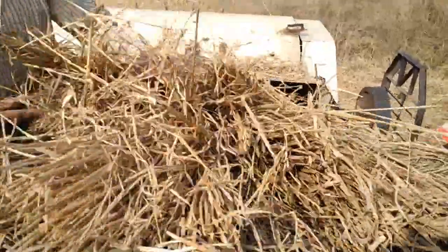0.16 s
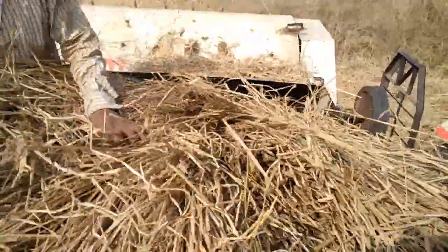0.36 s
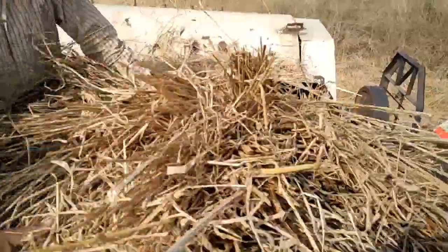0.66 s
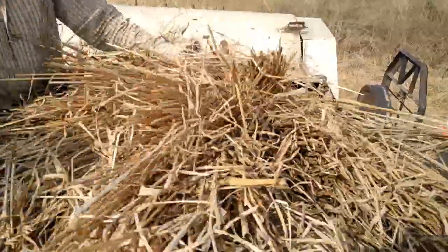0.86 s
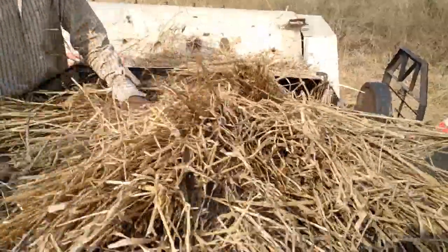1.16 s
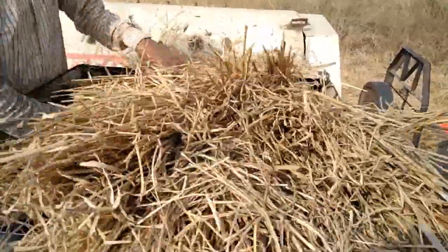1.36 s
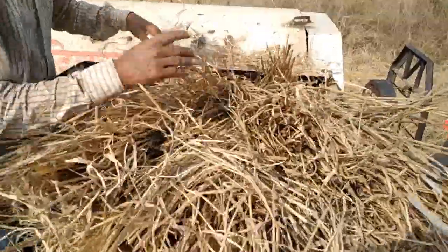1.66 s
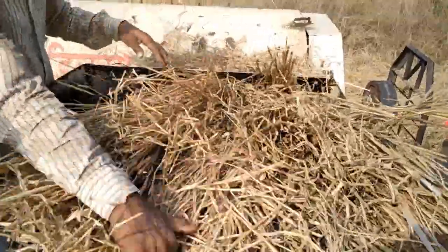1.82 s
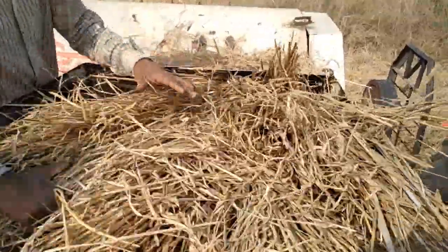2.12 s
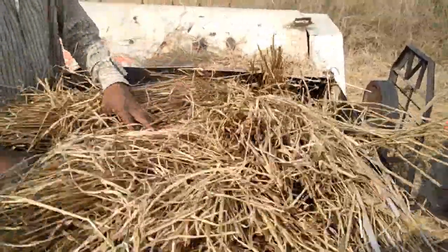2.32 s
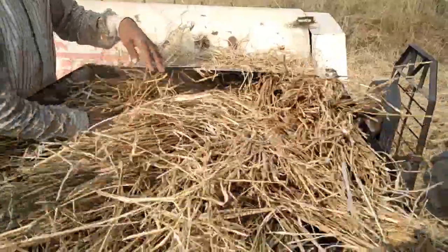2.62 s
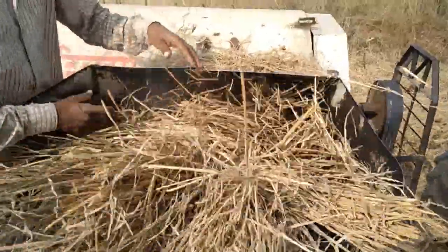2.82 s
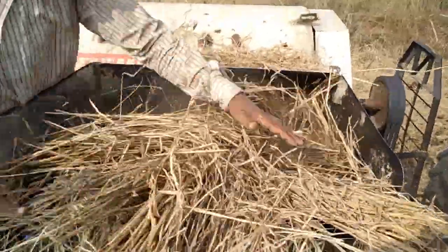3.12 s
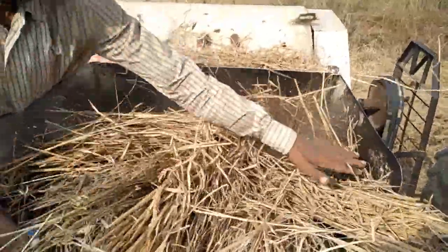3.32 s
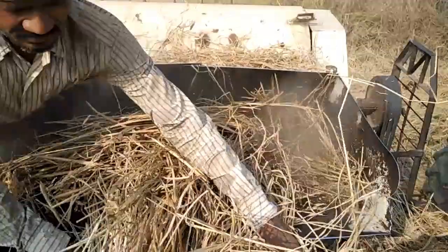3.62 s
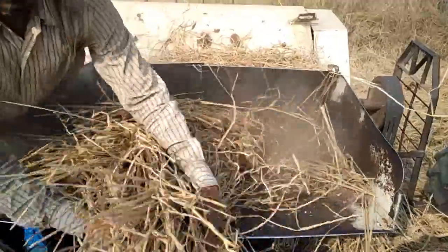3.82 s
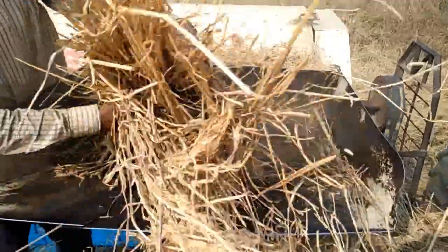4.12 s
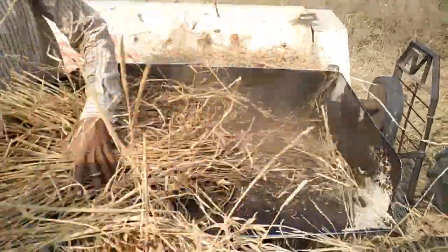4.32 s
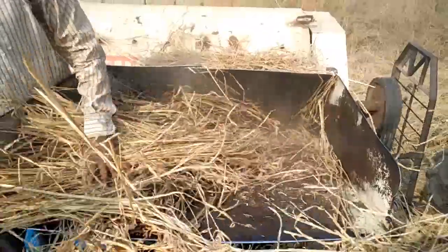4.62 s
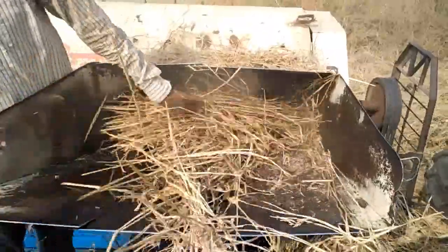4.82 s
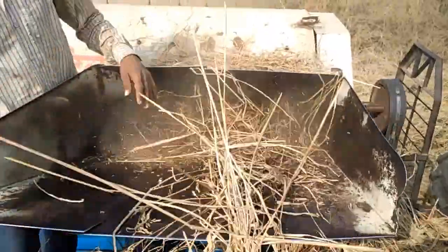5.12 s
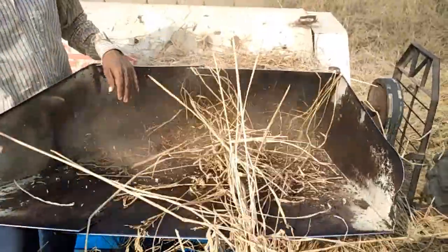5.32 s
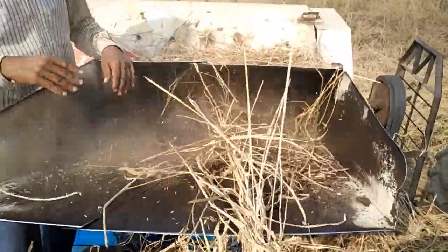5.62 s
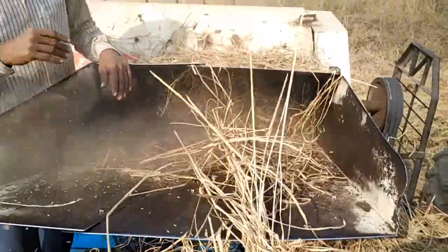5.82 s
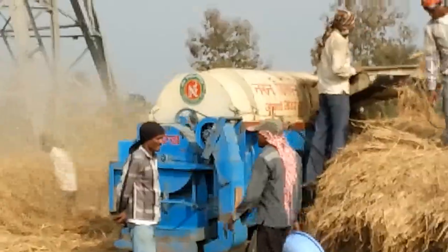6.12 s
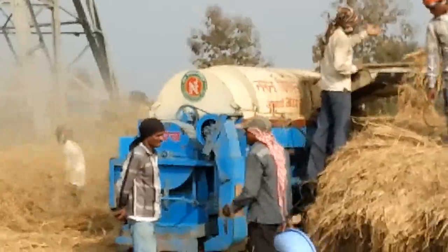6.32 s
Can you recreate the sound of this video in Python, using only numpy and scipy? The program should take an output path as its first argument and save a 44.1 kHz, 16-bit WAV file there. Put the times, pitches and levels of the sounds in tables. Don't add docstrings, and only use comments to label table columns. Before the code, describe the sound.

A threshing machine runs loaded as straw is pushed in by hand. It starts at full roar, with rapid uneven metal bangs, crackling straw and seed spraying on plates; the low roar thins slightly as the tray empties while the bright hiss holds up. Fan draught buffets a close stereo phone microphone outdoors. Everything stops abruptly just before six seconds, leaving silence.

```python
import sys
import numpy as np
from scipy import signal
from scipy.fft import rfft, irfft, next_fast_len
from scipy.io import wavfile
from scipy.ndimage import uniform_filter1d

SR = 44100
rng = np.random.default_rng(int(sys.argv[2]) if len(sys.argv) > 2 else 0)


def undo_db(level):
    steps = np.asarray(level, float) / 20
    return 10 ** steps


def generate_wav(signal):
    frames = np.transpose(np.atleast_2d(signal))
    scaled = np.clip(frames, -1, 1) * 32767
    pcm = np.round(scaled).astype(np.int16)
    wavfile.write(sys.argv[1], SR, pcm)


N = 284886

# time in seconds, roar level in dB.
DRUM_LOAD = [(0.0, -16), (0.16, -15.5), (0.67, -19.5), (0.8, -16.5), (1.08, -19), (1.15, -17.5),
             (1.33, -18.5), (1.49, -17.5), (1.69, -20), (2.92, -19), (2.97, -26), (3.36, -20.5),
             (4.25, -20), (4.94, -15.5), (5.02, -17.5), (5.89, -19)]
# frequency in Hz, density in dB per Hz.
THUD_SPECTRUM = [(15, -68), (25, -55.5), (118, -0.5), (193, 6.5), (277, 1.5), (343, -7.5), (551, -6.5),
                 (639, -7), (817, -1.5), (1030, -7), (1250, -29.5), (1620, -54), (2750, -120)]
# centre in Hz, share of the roar in dB, change as the tray empties in dB.
CASING_PARTS = [(200, -4.5, -7), (370, -7.5, -4), (540, -9.5, 0.5), (800, -8, -0.5)]
# centre in seconds, gain in
# dB, part of the casing in Hz, length in seconds.
WAD_HITS = [(0.02, 2, 800, 0.093), (0.19, 4.5, 427, 0.15), (0.736, 4, 370, 0.039), (0.806, 10, 480, 0.034),
            (0.917, 8, 580, 0.13), (1.155, 7, 258, 0.055), (1.298, 7, 540, 0.054), (1.443, 6.5, 610, 0.034),
            (1.55, 1.5, 370, 0.086), (1.64, 5.5, 520, 0.065), (1.727, 7, 370, 0.088), (1.84, 5, 200, 0.089),
            (2.212, 10, 520, 0.14), (2.413, 8, 370, 0.053), (2.414, 5, 800, 0.042), (2.573, 9, 566, 0.044),
            (2.634, 8.5, 200, 0.038), (2.755, -1.5, 540, 0.07), (2.84, 1, 200, 0.041),
            (3.232, 8, 540, 0.085), (3.358, 3, 800, 0.04), (3.58, 5.5, 395, 0.14), (3.867, 8.5, 370, 0.29),
            (4.02, 3, 370, 0.088), (4.28, 5, 745, 0.22), (4.435, 9, 288, 0.18), (4.675, 7, 800, 0.029),
            (4.837, 15, 484, 0.021), (4.958, 7, 800, 0.04), (5.568, 5.5, 200, 0.05), (0.02, 5, 380, 0.051),
            (0.6, -5, 350, 0.1), (0.64, 4, 850, 0.029), (0.69, 4.5, 540, 0.1), (1.363, 6, 190, 0.033),
            (2.07, 5, 540, 0.055), (2.858, 4, 540, 0.054), (3.1, 3, 540, 0.074), (3.203, -5, 200, 0.044),
            (3.381, 6.5, 240, 0.06), (3.7, 2, 320, 0.042), (3.735, 2, 850, .05), (3.94, -6, 558, 0.048),
            (4.165, 6.5, 370, .04), (4.23, 3, 556, 0.021), (4.643, 4.5, 200, 0.055), (4.716, 7, 300, 0.044),
            (5.609, -1.5, 340, 0.059), (5.8, 5.5, 646, 0.057), (5.873, 5.5, 200, 0.046)]
# frequency in Hz, width in Hz, level in dB.
PANEL_MODES = [(138, 34, -24.5), (159, 21, -6.5), (191, 31, -2), (199, 52, -2), (258.6, 39, -2),
               (340, 19, -3.5), (366, 13, -5), (443, 91, -19), (520, 19, -13.5), (734, 46, -4),
               (1026, 50, -6), (1660, 18, -13), (2347, 56, -13.5)]
# frequency in Hz, density in dB per Hz.
STALK_SPECTRUM = [(680, -19), (1150, 5), (1520, 2), (1670, -7.5), (1810, -11.5), (2360, -13), (3200, -24),
                  (4160, -65), (7040, -120)]
# centre in seconds, gain in dB, length in
# seconds, left minus right in dB.
STALK_SNAPS = [(0.01, 6, 0.043, 1), (0.13, 2.5, 0.074, 2.5), (0.39, 4.5, 0.089, 4), (0.64, 2, 0.055, 3),
               (0.82, 1.7, .05, 1), (0.97, 0.5, .05, 3), (1.44, 6, 0.065, 3.5), (1.6, 2.3, .15, 3),
               (2.1, 5.5, 0.031, 4), (2.25, 7.5, 0.022, 5), (2.39, 2, 0.076, 1), (2.7, 0.8, .2, 0),
               (2.86, 5.5, 0.054, 0), (3.51, 3.5, 0.042, 2), (3.75, 2.9, 0.17, 0), (3.95, 3, 0.11, 3),
               (4.18, 7.5, 0.032, 4), (4.36, 6.5, 0.045, 1), (4.65, 0.7, 0.127, 3), (4.82, 7.5, 0.034, 5),
               (4.96, 5.5, .08, 1), (5.13, 5.5, 0.044, -1), (5.3, 3.5, 0.061, 3.5), (5.61, 7.1, 0.05, 2),
               (5.77, 3.5, 0.059, 5), (0.27, 2.5, 0.045, 1), (0.69, 1.5, .04, 2), (1.11, -1, 0.033, 7),
               (1.66, -1, .04, 1), (2.49, -2.5, 0.079, 0), (2.98, 2, 0.1, 0), (3.12, 1, .1, 0),
               (3.37, 1.5, .07, -3), (3.46, -3, .05, 3), (5.24, 1, .04, 3), (5.68, 5, 0.035, 4)]
# time in seconds, level in dB.
CHAFF_FLOW = [(0.0, -17), (0.05, -23.5), (0.92, -20.5), (0.95, -25), (1.31, -17.5), (1.59, -19.5),
              (2.08, -19), (2.29, -20.5), (2.41, -18.5), (2.46, -18.5), (2.95, -14.5), (3.48, -18),
              (4.54, -17), (4.69, -20.5), (5.03, -14.5), (5.76, -20), (5.79, -9.5), (5.89, -17.5)]
# frequency in Hz, density in dB per Hz.
SEED_SPECTRUM = [(1820, -29), (3100, -11.5), (3410, -7.5), (3940, -4), (5830, -6), (6480, -7.5),
                 (8190, -4.5), (11300, -5.5), (14000, -7)]
# centre in seconds, gain in dB, length in seconds, coarse
# over fine in dB.
SEED_SWELLS = [(0.07, -2, 0.013, 4), (0.11, 5, 0.015, -2.5), (0.51, -4.5, 0.041, 2.5), (0.55, 2, 0.017, -1),
               (0.82, 1.5, 0.092, -1.5), (1.43, -2, 0.04, 5.5), (1.93, 4, 0.031, -0.5),
               (2.13, 1.5, 0.068, 1), (2.4, 2.5, 0.025, -2.5), (2.46, -1, 0.024, -3),
               (2.51, 5, 0.026, -6.5), (2.54, -5.5, 0.071, 2), (2.73, 3.5, 0.022, -0.5),
               (2.77, -4, 0.11, 1), (2.95, 0, 0.26, 2), (4.17, 2, 0.02, 2), (4.49, 1.5, 0.043, -1),
               (4.77, -3, 0.35, 4.5), (5.82, -4.5, 0.075, -1), (0.02, -2, .04, 4), (0.26, 2.5, 0.037, -1.5),
               (0.45, 1, 0.057, 1.5), (0.69, -2, .05, 1.5), (1.06, 1.5, 0.033, -2), (1.29, 0.5, .05, 0),
               (1.68, 1.5, 0.025, 0.5), (1.77, 1, .03, 1), (1.88, 0, .05, 2), (2.01, 2, 0.062, 0),
               (2.36, 0.5, 0.038, 1.5), (2.66, 0.5, 0.078, -1), (3.21, -4, 0.041, 2.5),
               (3.33, 0.5, 0.068, 2), (3.45, -1, 0.055, 1.5), (3.51, 1, 0.057, 2.5), (3.57, -2.5, .04, 2),
               (3.7, 1.5, 0.025, -2), (3.8, -1, 0.035, 3.5), (3.99, 2, 0.043, -3), (4.35, 2.5, 0.038, -2),
               (4.43, 3, 0.019, -2.5), (4.59, 2.5, .04, -4.5), (4.83, 4, 0.029, 0.5),
               (5.07, -1.5, .05, 1.5), (5.32, 1, 0.13, 0.5), (5.47, -1, 0.035, 2), (5.55, -1.5, 0.03, 2),
               (5.62, 3, 0.037, 1.5), (5.68, 1, 0.037, 2), (5.73, -0.5, 0.021, 3.5)]
# centre in seconds, gain in dB, length in seconds.
HUSK_SWELLS = [(0.29, 2.5, 0.11), (0.7, -0.5, 0.13), (1.0, 1, .06), (1.1, -3, 0.13), (1.41, -2, .05),
               (1.53, 2, 0.058), (2.5, 1, .06), (2.64, -0.5, 0.071), (2.8, 2.5, 0.057), (3.36, 0.5, 0.15),
               (3.6, 0, .09), (3.83, -2.5, .12), (3.98, 0, .07), (4.11, 0, 0.059), (4.29, 1.5, 0.072),
               (4.74, -1.5, 0.17), (4.83, -1, 0.032), (5.31, 1, 0.037), (5.65, -1, 0.099)]
# start in seconds, peak in dB, ring in Hz,
# length in seconds.
SEED_SPRAYS = [
    (0.314, -19.5, 5920, 0.11),
    (0.492, -16, 5710, 0.031),
    (0.578, -10, 6200, 0.052),
    (1.21, -28, 5880, 0.051),
    (1.655, -15.5, 5950, 0.061),
    (2.029, -9, 6100, 0.058),
    (2.226, -22, 5780, 0.042),
]
# multiple of the firing rate, level in dB.
FIRING_HARMONICS = [(2, -66), (3, -53), (4, -37.5), (5, -69.5)]
# start in seconds, peak in dB, ring in Hz, left minus right in dB.
LUMP_HITS = [(0.442, -4, 218, 1), (0.777, -4, 206, 0), (1.13, -1, 202, 2.5), (1.991, -6, 317, 1.5),
             (2.177, -10.5, 193, 4.5), (2.418, -8.5, 340, 2), (2.512, -39.5, 168, -15.5),
             (2.815, -28, 167, -10), (2.898, -10.5, 550, -2), (2.96, -15.5, 236, -1), (3.258, -10, 356, -4),
             (3.323, -20.5, 159, -14), (3.463, -9.5, 170, 2.5), (3.964, -13, 257, 7.5),
             (4.696, -6, 212, -4.5), (5.452, -6.5, 346, 0.5), (5.502, -16, 182.6, -8.5),
             (0.04, -13, 182, -7), (0.54, -13.5, 191, -1), (1.165, -4, 212, 1), (1.218, -9, 200, -3),
             (1.491, -2, 200, 1.5), (1.789, -5, 198, 0), (2.738, -10.5, 500, -2), (2.853, -12.5, 540, -4.5),
             (3.054, -10, 192, 2), (3.396, -13.5, 391, 1), (3.56, -10, 412, 2), (4.155, -10.5, 370, 0),
             (4.435, -6, 330, -0.5), (4.95, -11, 200, 1), (5.838, -6.5, 200, -0.5)]
# start in seconds, length in seconds, start pitch in Hz,
# rise in Hz per second, level in dB.
WAD_GROANS = [
    (0.757, .12, 425, 582, -24.5),
    (1.561, .1, 345, 697.5, -19),
    (3.811, .1, 343, 48, -24),
    (3.962, .12, 340, 0, -23),
    (4.8, .15, 410, 330, -18.5),
]
# frequency in Hz, left minus right in dB.
PORT_SHADE_DB = [(60, 2.5), (370, 4), (1250, 3), (2290, 0.5), (4210, 2), (6000, 5.5), (8000, 8),
                 (11000, 4.5), (14200, 0.5)]
# frequency in Hz, share common to both from 0 to 1.
PORT_LIKENESS = [(30, .2), (60, 0.7), (130, .93), (290, 0.7), (620, 0.9), (1360, 0.2), (2970, 0),
                 (14200, 0.03)]
# frequency in Hz, threshold in dB.
DROPOUT_DB = [(2550, -10), (2800, -1), (3100, 0), (3450, 2.5), (3900, 0), (4700, 0.5), (5300, -1),
              (6500, -4.5), (8500, -11), (12000, -10), (14000, -3.5)]

ENGINE_HZ = 24.25
PORT_LAG_S = 0.00017
CUT_S, TOP_HZ = 5.8955, 14270
WAD_SPREAD_OCT, GROAN_EDGE_S = 0.38, 0.028
DRUM_FLICKER_DB, STALK_FLICKER_DB, CHAFF_FLICKER_DB = 1.5, 0.6, 0.5

SIZE = next_fast_len(N)
HZ = np.fft.rfftfreq(SIZE, 1 / SR) + 1e-9
TIME_S = np.arange(N) / SR
COARSE_TIME_S = TIME_S[::128]
EMPTIED = TIME_S / CUT_S


def unit(x):
    return x / np.sqrt(np.mean(x ** 2))


def level_curve(table):
    s, db = np.transpose(table)
    return uniform_filter1d(np.interp(TIME_S, s, db), size=900)


def along(table, hz):
    table_hz, value = np.transpose(table)
    return np.interp(np.log(hz), np.log(table_hz), value)


def bump(s, length_s):
    return np.exp(-0.5 * ((COARSE_TIME_S - s) * 2 / max(length_s, 0.01)) ** 2)


def swells(rows, column):
    total = sum(row[column] * bump(row[0], row[2]) for row in rows)
    return np.interp(TIME_S, COARSE_TIME_S, total)


def walk(rate_hz):
    k = int(SR / rate_hz)
    held = np.repeat(rng.standard_normal(N // k + 1), k)
    return 1.3 * uniform_filter1d(uniform_filter1d(held, k), k)[:N]


def blows(rate_hz, scatter_db):
    when, sign, rarity = rng.random((int(rate_hz * N / SR), 3)).T
    size = np.sign(sign - 0.5) * undo_db(-scatter_db * np.log(1 - rarity))
    return unit(np.bincount((when * N).astype(int), size, N))


def ring(x, hz, width_hz):
    radius = np.exp(-np.pi * width_hz / SR)
    return unit(signal.lfilter([1], [1, -2 * radius * np.cos(2 * np.pi * hz / SR), radius ** 2], x))


def pan_gains(pan_db):
    return undo_db(np.array([pan_db, -pan_db]) / 2)


def ports(excite):
    share = np.sqrt(np.clip(along(PORT_LIKENESS, HZ), 0, 1))
    common, left, right = (rfft(excite(), SIZE) for _ in range(3))
    late = common * np.exp(-2j * np.pi * HZ * PORT_LAG_S)
    return np.sqrt(share) * np.array([late, common]) + np.sqrt(1 - share) * np.array([left, right])


def stream(excite, spectrum, levels_db, splits_hz, pan_db, swell_db, flicker_db, rate_hz):
    source = ports(excite) * undo_db(along(spectrum, HZ))
    shade_db = along(PORT_SHADE_DB, HZ) - along(PORT_SHADE_DB, splits_hz[0])
    source = source * undo_db(shade_db * np.array([[0.5], [-0.5]]))
    swell = walk(rate_hz)
    parts = [0] * len(levels_db)
    first, last = int(2 * np.log2(spectrum[1][0])), int(2 * np.log2(spectrum[-1][0])) + 1
    for step in range(first, last + 1):
        place = np.clip(2 * np.log2(HZ) - step, -1, 1)
        band = irfft(source * np.cos(np.pi * place / 2) ** 2, SIZE)[:, :N]
        part = np.searchsorted(splits_hz, 2 ** (step / 2))
        parts[part] += band * undo_db(swell_db * swell + flicker_db * walk(rate_hz))
    total = sum(unit(part) * undo_db(db) for part, db in zip(parts, levels_db))
    return total * pan_gains(pan_db)


def casing_db(hz, share_db, change_db):
    wads_db = 0
    for s, db, wad_hz, length_s in WAD_HITS:
        nearness = np.exp(-0.5 * (np.log2(wad_hz / hz) / WAD_SPREAD_OCT) ** 2)
        wads_db = wads_db + db * nearness * bump(s, length_s)
    wads_db = np.interp(TIME_S, COARSE_TIME_S, wads_db)
    return level_curve(DRUM_LOAD) + share_db + change_db * EMPTIED + wads_db


def drum():
    levels_db = [casing_db(*part) for part in CASING_PARTS]
    pan_db = 2 - 2.5 * EMPTIED + 0.4 * walk(21)
    thud = stream(lambda: blows(1500, scatter_db=1.0), THUD_SPECTRUM, levels_db, [300, 450, 650], pan_db,
                  swell_db=0.32, flicker_db=DRUM_FLICKER_DB, rate_hz=12)
    panels = 0
    for hz, width_hz, db in PANEL_MODES:
        drive_db = levels_db[np.searchsorted([300, 470, 680], hz)] + DRUM_FLICKER_DB * walk(14)
        side_db = rng.uniform(-1.2, 1.2) * np.array([[1], [-1]])
        mode = ring(blows(120, scatter_db=2.5), hz, width_hz)
        panels = panels + undo_db(side_db) * undo_db(db + drive_db) * mode
    panels = signal.sosfilt(signal.butter(1, 60, "high", fs=SR, output="sos"), panels)
    return thud + undo_db(-2) * panels * pan_gains(pan_db)


def stalks():
    load_db = level_curve(DRUM_LOAD)
    db = -31 + 0.2 * (load_db - load_db.mean()) + swells(STALK_SNAPS, column=1)
    pan_db = -2 + 2 * walk(9) + swells(STALK_SNAPS, column=3)
    return stream(lambda: blows(2500, scatter_db=2.0), STALK_SPECTRUM, [db - 0.5, db + 1.5], [1800], pan_db,
                  swell_db=STALK_FLICKER_DB / 2, flicker_db=STALK_FLICKER_DB, rate_hz=18)


def chaff():
    throb_db = 0.46 * np.sin(np.pi * ENGINE_HZ * TIME_S)
    db = level_curve(CHAFF_FLOW) - 1.2 + swells(SEED_SWELLS, column=1) + throb_db
    coarse_db = db - 3 + swells(SEED_SWELLS, column=3) + CHAFF_FLICKER_DB * walk(6.6)
    dust_db = db - 3 + 5 * EMPTIED + CHAFF_FLICKER_DB * walk(25)
    husk_db = coarse_db - 4.5 + swells(HUSK_SWELLS, column=1)
    pan_db = 3.5 - EMPTIED + 1.8 * walk(11)
    levels_db = [husk_db, coarse_db - 2.14, db - 0.5, dust_db + 4.0]
    out = stream(lambda: blows(9000, scatter_db=1.5), SEED_SPECTRUM, levels_db, [4500, 7000, 10000], pan_db,
                 swell_db=CHAFF_FLICKER_DB, flicker_db=CHAFF_FLICKER_DB, rate_hz=30)
    patter = blows(3000, scatter_db=2.0)
    out[0] += ring(patter, 5900, 500) * undo_db(levels_db[1] - 7 + 4 * walk(12))
    for s, peak_db, hz, length_s in SEED_SPRAYS:
        age = np.clip(TIME_S - s, 0, 1) / max(length_s, 0.01)
        plate = ring(ring(patter, hz, 1200), hz, 1200)
        out[0] += plate * undo_db(peak_db) * np.exp(-age) * np.minimum(3 * age, 1)
    return out


def engine():
    phase = 2 * np.pi * np.cumsum(ENGINE_HZ * (1 + 0.0047 * walk(1.2))) / SR
    return sum(undo_db(db + 2.1 * walk(2.5)) * np.sin(k * phase) for k, db in FIRING_HARMONICS)


def buffet():
    sides = []
    for _ in range(2):
        draught = ring(rng.standard_normal(N), 93, 60)
        sides.append(draught * undo_db(-39 + 2.5 * walk(8.8)))
    return np.array(sides)


def lumps():
    out, t = np.zeros((2, N)), np.arange(3000) / SR
    envelope = unit(t * np.exp(-t / 0.01))
    for s, db, hz, pan_db in LUMP_HITS:
        start = int(s * SR)
        knock = envelope * np.sin(2 * np.pi * hz * t) * undo_db(db - 12.5)
        out[:, start:start + len(t)] += knock * pan_gains(np.array([pan_db]))
    return out


def groan():
    out, rough_db, waver = np.zeros(N), 2.2 * walk(60), 1 + 0.03 * walk(50)
    for s, length_s, hz, rise, db in WAD_GROANS:
        span = slice(int((s - GROAN_EDGE_S) * SR), int((s + length_s + GROAN_EDGE_S) * SR))
        age_s = TIME_S[span] - s
        shape = np.clip(np.minimum(age_s, length_s - age_s) / GROAN_EDGE_S + 1, 0, 1) ** 2
        phase = 2 * np.pi * np.cumsum((hz + rise * age_s) * waver[span]) / SR
        out[span] = shape * undo_db(db + rough_db[span]) * np.sin(phase)
    return out


def scene():
    return drum() + stalks() + chaff() + engine() + buffet() + lumps() + groan()


def drop_weak_bands(x, size=4):
    hz, _, cells = signal.stft(x, SR, nperseg=2048)
    power = (np.abs(cells[:, :1024].reshape(2, -1, size, cells.shape[2])) ** 2).mean(axis=2)
    power = uniform_filter1d(np.sqrt(power * power.mean(axis=0)), size=2)
    bright = uniform_filter1d(power[:, 100:160].mean(axis=(0, 1)), size=9)
    usual = power.mean(axis=(0, 2))[:, None] * (bright / bright.mean()) ** 0.8
    lately = uniform_filter1d(power.mean(axis=0), size=7)
    whim_db = 6.5 * uniform_filter1d(rng.standard_normal(lately.shape), size=8)
    usual = usual ** 0.3 * lately ** 0.7 * undo_db(whim_db)
    threshold = undo_db(2 * along(DROPOUT_DB, hz[size // 2:1024:size]))[:, None]
    keep = power > usual * threshold
    keep[:, :int(2400 / hz[size])] = True
    gain = np.ones(cells.shape)
    gain[:, :1024] = np.repeat(np.where(keep, 1, 0.03), size, axis=1)
    return signal.istft(cells * gain, SR, nperseg=2048)[1][:, :N]


def top_cut(x):
    return signal.sosfilt(signal.butter(12, 14770, fs=SR, output="sos"), x)


def record(dry):
    thin = signal.sosfilt(signal.butter(3, 48, "high", fs=SR, output="sos"), dry)
    limited = drop_weak_bands(0.96 * np.tanh(thin / 0.96))
    stop = np.where(TIME_S > CUT_S, undo_db(-24 - 2500 * (TIME_S - CUT_S)), 1)
    lowpass = np.clip((TOP_HZ - HZ) / 60 + 0.5, 0, 1)
    narrow = irfft(rfft(limited * stop, SIZE) * lowpass, SIZE)[:, :N]
    return top_cut(np.clip(narrow, -1, 1))


dry = scene()
out = record(dry)
generate_wav(out)
```